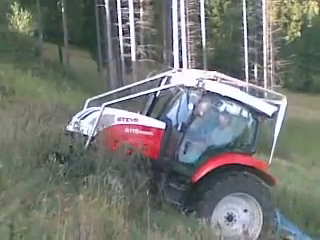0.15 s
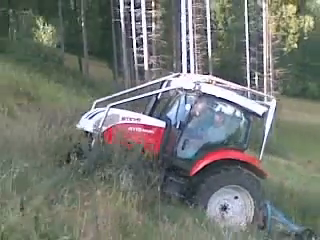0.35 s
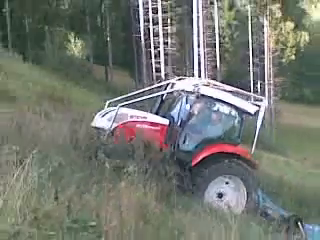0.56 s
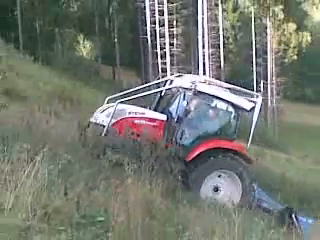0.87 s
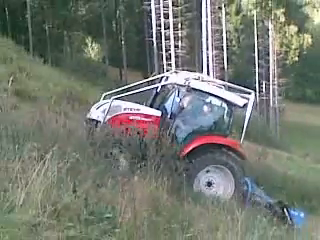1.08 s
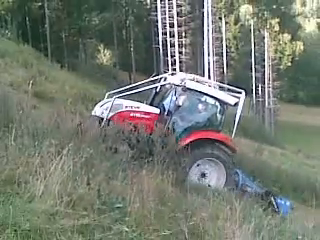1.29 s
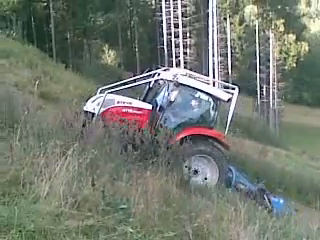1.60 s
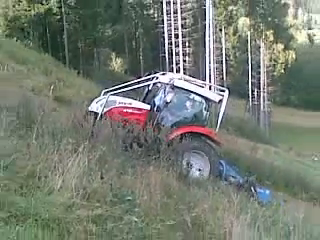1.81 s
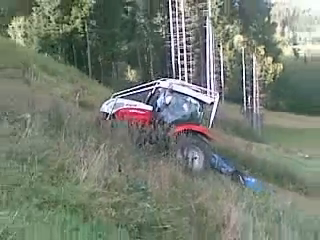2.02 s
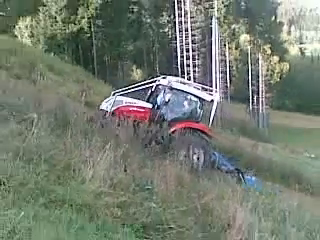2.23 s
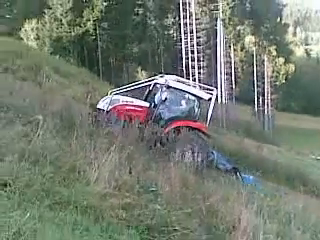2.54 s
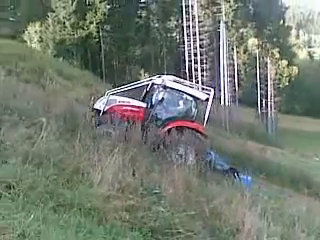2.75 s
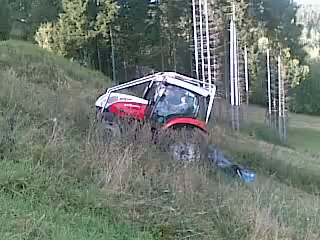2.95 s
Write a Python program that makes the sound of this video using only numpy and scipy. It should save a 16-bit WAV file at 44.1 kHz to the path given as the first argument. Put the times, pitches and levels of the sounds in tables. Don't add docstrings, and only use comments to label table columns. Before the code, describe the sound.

A tractor's diesel engine drones continuously, its low exhaust beating rapidly near fifty pulses a second with rough chuffs and midrange clatter. A mulcher whirrs and hisses through grass beneath it. Stones and stalks knock the hood from about 0.5 s, hardest near 0.9 and 1.4 s. From 2 s the engine sags slightly, shredding swells around 2.6 s, then engine speed recovers by 3 s. Outdoors, close, mono small-camera sound.

```python
import sys
import numpy as np
from scipy import signal
from scipy.fft import rfft, irfft, next_fast_len
from scipy.io import wavfile
from scipy.ndimage import uniform_filter1d

SR = 44100
rng = np.random.default_rng(int(sys.argv[2]) if len(sys.argv) > 2 else 0)


def output_pcm(signal):
    pcm = np.clip(np.atleast_2d(signal).T, -1, 1) * 32767
    wavfile.write(sys.argv[1], SR, np.round(pcm).astype(np.int16))


def volts_from_decibels(level):
    exponent = np.asarray(level, float) / 20
    return 10 ** exponent


N = 138915

# t/s, firings/Hz
FIRING_RATE = [(0.0, 49.45), (0.26, 49.2), (0.52, 49.11), (0.79, 49.25), (1.05, 49.23), (1.31, 48.89),
               (1.58, 48.82), (1.84, 48.74), (2.1, 48.15), (2.36, 47.84), (2.62, 47.96), (2.89, 48.5),
               (3.15, 49.66)]
# t/s, load/dB
CUTTING_LOAD = [(0, 2.5), (.3, -1), (.55, -1.4), (.8, -0.4), (1.05, -0.3), (1.3, 0), (1.6, -1.8),
                (1.85, 0.5), (2.1, 1), (2.36, 2.3), (2.6, 3), (2.75, 2), (2.9, 1.2), (3.15, 1.5)]
# multiple of the firing rate, level/dB
EXHAUST_TONES = [(0.5, -62), (0.75, -60), (1, -35.5), (1.5, -66), (1.75, -68), (2, -29.5), (2.25, -47.5),
                 (2.5, -60), (3, -35), (3.5, -60), (4, -45), (5, -47.5), (6, -50.5), (6.5, -61), (7, -52.5),
                 (7.5, -52), (8, -47.5), (8.5, -55.5), (9, -56), (9.5, -60.5), (9.75, -48)]
# f/Hz, level per Hz/dB
CHUFF_COLOUR = [(38, -5), (70, -5.5), (125, -4.5), (230, -2), (330, -2.5), (470, -3.5), (560, -9),
                (650, -29)]
# f/Hz, level per Hz/dB
BLOCK_COLOUR = [(640, -17.5), (830, -9), (1290, -1), (1640, -5), (1800, -12.5), (2380, -15), (2600, -21.5),
                (2780, -28)]
# f/Hz, width/Hz, level/dB
BLOCK_RINGS = [(1175, 67, -55), (1288, 75, -52.5), (1485, 59, -50.5), (1615, 53, -57.5), (834.4, 51, -57.5)]
# f/Hz, width/Hz, level/dB
ROTOR_TONES = [(169.4, 3.9, -46), (450.5, 40, -50.5)]
# f/Hz, level per Hz/dB
HOOD_COLOUR = [(2650, -7), (3200, -8), (3550, 0.5), (3900, 0.5), (4330, -9.5), (4780, -6), (5200, -19),
               (5500, -24)]
# f/Hz, level per Hz/dB
GRASS_COLOUR = [(5200, -6.5), (6300, 1.5), (6750, -2), (7050, 2), (7500, -1), (9200, -1.5), (9650, -3.5),
                (10300, -17)]
# f/Hz, level per Hz/dB
CHAFF_COLOUR = [(10300, -15.5), (10600, -3), (11300, 1.5), (12200, -1), (12550, -7), (13000, -1),
                (13700, -7), (15700, -5.5)]
# t/s, ring f/Hz, ring level/dB, thud level/dB, snap level/dB
CRACKS = [(.4802, 3200, -36, -24, -52), (0.8595, 3100, -24, -30, -28), (1.0906, 3100, -39, -27, -52),
          (1.3868, 3300, -28, -28, -28), (1.8313, 3200, -33, -25, -52), (1.9373, 7500, -41, -50, -50),
          (2.105, 3100, -39, -45, -50), (2.297, 3100, -42, -49, -48), (2.6895, 7000, -42, -45, -42),
          (.0878, 6000, -40, -53, -42), (.908, 3900, -42, -60, -52), (.8272, 1400, -22, -50, -55),
          (.4915, 2600, -36, -50, -55)]

PATCH_DB = 0.79


def evened(x):
    return x / np.sqrt(np.mean(x ** 2) + 1e-20)


def curve(points):
    return np.interp(np.arange(N) / SR, *np.transpose(points))


def colour(x, points):
    f, db = np.transpose(points)
    size = next_fast_len(N)
    hz = np.fft.rfftfreq(size, 1 / SR) + 1
    octaves_outside = np.log2(np.maximum(f[0] / hz, 1)) + np.log2(np.maximum(hz / f[-1], 1))
    gain = volts_from_decibels(np.interp(np.log(hz), np.log(f), db) - 90 * octaves_outside)
    return evened(irfft(rfft(x, size) * gain, size)[:N])


def wander(per_s):
    knots = np.arange(0, N / SR + 1, 1 / per_s)
    drift = curve(np.c_[knots, rng.standard_normal(len(knots))])
    return evened(uniform_filter1d(drift, int(SR / per_s)))


def whistle(x, hz, width):
    turn = np.exp(2j * np.pi * np.cumsum(hz * np.ones(N)) / SR)
    r = np.exp(-np.pi * width / SR)
    smoothed = signal.lfilter([1], [1, -2 * r, r * r], x / turn)
    return evened((turn * smoothed).real)


def patchy(patch_db):
    a, b, patches = rng.standard_normal((N // 128 + 5, 257, 3)).T
    patches = uniform_filter1d(patches, size=6, axis=0)
    patches = evened(uniform_filter1d(patches, size=24, axis=1))
    spectrum = (a + 1j * b) * volts_from_decibels(patch_db * patches)
    return evened(signal.istft(spectrum, nperseg=512, noverlap=384)[1][:N])


def per_firing(turns, swell_db, lag, vary_db):
    firing = np.floor(turns - lag + 1.5).astype(int) + 2
    strength = rng.standard_normal(400)[firing]
    swell = np.cos(2 * np.pi * (turns - lag))
    return volts_from_decibels(swell_db * swell + vary_db * strength * (1 + swell) / 2)


def exhaust(turns):
    t = np.arange(N) / SR
    beats = 0
    for k, db in EXHAUST_TONES:
        level = db + 0.36 * np.sqrt(k / 2) * wander(14)
        if k == 3:
            level = level + 1.36 * (t - 1.6)
        if k % 1:
            lean = 1.2
        else:
            lean = -.8 + 1.55 / (1 + (3.7 / k) ** 10)
        beats = beats + np.sqrt(2) * volts_from_decibels(level) * np.cos(2 * np.pi * k * turns + lean)
    gas = rng.standard_normal(N) * per_firing(turns, swell_db=2.5, lag=0.018, vary_db=1.5)
    chuffs = volts_from_decibels(-38 + 0.27 * curve(CUTTING_LOAD)) * colour(gas, CHUFF_COLOUR)
    return beats + chuffs


def block(turns):
    drive = patchy(PATCH_DB) * per_firing(turns, swell_db=0.75, lag=0.13, vary_db=0)
    clatter = volts_from_decibels(-35.5) * colour(drive, BLOCK_COLOUR)
    for hz, width, db in BLOCK_RINGS:
        drifting_hz = hz * (1 + 0.018 * wander(3.0))
        clatter = clatter + volts_from_decibels(db) * whistle(drive, drifting_hz, width)
    growth_db = 0.79 * (np.arange(N) / SR - 2.13)
    return volts_from_decibels(growth_db) * clatter


def mulcher():
    speed = curve(FIRING_RATE) / np.mean(curve(FIRING_RATE))
    out = 0
    for hz, width, db in ROTOR_TONES:
        out = out + volts_from_decibels(db) * whistle(rng.standard_normal(N), hz * speed, width)
    snips_per_s, spread_db = 2700, 4
    strength = volts_from_decibels(spread_db * np.minimum(rng.exponential(1, N), 5))
    snips = (rng.random(N) < snips_per_s / SR) * strength * rng.choice([-1., 1.], N)
    puff = rng.standard_normal(40) * np.hanning(40)
    snips = evened(signal.oaconvolve(snips, puff, "same"))
    snip_share, flicker_db = 0.47, 0.66
    cut = np.sqrt(1 - snip_share ** 2) * patchy(PATCH_DB) + snip_share * snips
    cut = cut * volts_from_decibels(flicker_db * wander(25.0))
    load = curve(CUTTING_LOAD)
    # level in dB, how strongly it follows the load, colour
    layers = (-54, 0.58, HOOD_COLOUR), (-62.5, 0.9, GRASS_COLOUR), (-69.5, 0.95, CHAFF_COLOUR)
    for db, follows, tone in layers:
        out = out + volts_from_decibels(db + follows * load) * colour(cut, tone)
    return out


def cracks():
    length = 1500
    t = np.arange(length) / SR
    out = np.zeros(N + length)
    strike = np.minimum(t / .00014, 1)
    thud_hz, thud_s, snap_hz, snap_s, grit_db, grit_s = 730, 0.009, 6300, 0.0011, -16, .004
    for start, hz, ring_db, thud_db, snap_db in CRACKS:
        ring = volts_from_decibels(ring_db - 60 * t * hz / 14) * np.sin(2 * np.pi * hz * t)
        thud = volts_from_decibels(thud_db - 60 * t / thud_s) * np.sin(2 * np.pi * thud_hz * t)
        snap = volts_from_decibels(-60 * t / snap_s) * np.sin(2 * np.pi * snap_hz * t)
        noise = np.diff(rng.standard_normal(length), prepend=0)
        grit = volts_from_decibels(grit_db - 60 * t / grit_s) * np.convolve(noise, np.ones(2) / 2, "same")
        hit = strike * (ring + thud - volts_from_decibels(snap_db) * (snap + grit))
        first = round(start * SR)
        out[first:first + length] += hit
    return out[:N]


def scene():
    turns = -.66 + np.cumsum(curve(FIRING_RATE)) / SR
    mix = exhaust(turns) + block(turns) + mulcher() + cracks()
    return mix[None]


def top_cut(x):
    return signal.sosfilt(signal.butter(12, 15750, fs=SR, output="sos"), x)


def record(dry):
    hz, t, z = signal.stft(dry, SR, nperseg=1024, noverlap=768, boundary="even")
    power = uniform_filter1d(abs(z) ** 2, size=2, axis=1)
    power = uniform_filter1d(power, size=6, axis=2)
    level_db = 10 * np.log10(abs(power) + 1e-20)
    limit_db = -95.6 + .7 * np.interp(t, *np.transpose(CUTTING_LOAD))
    faint = (level_db < limit_db) & (hz[:, None] > 9000)
    gated = z * np.where(faint, volts_from_decibels(-26), 1)
    mix = signal.istft(gated, SR, nperseg=1024, noverlap=768)[1][:, :N]
    return top_cut(mix)


dry = scene()
out = record(dry)
output_pcm(out)
```